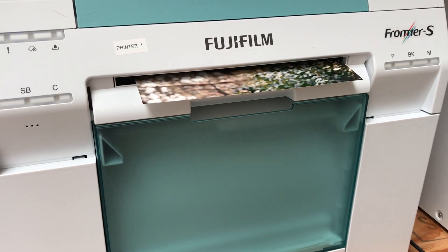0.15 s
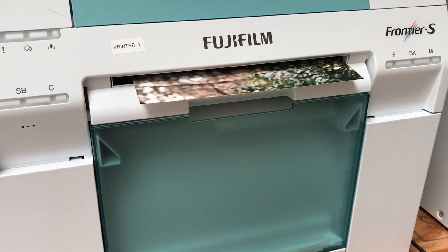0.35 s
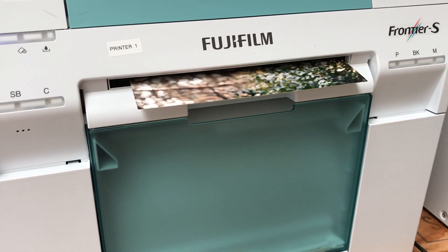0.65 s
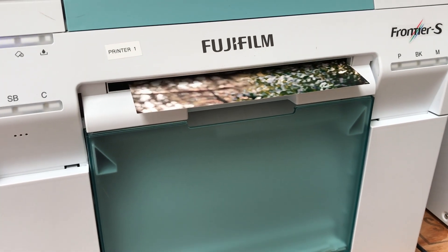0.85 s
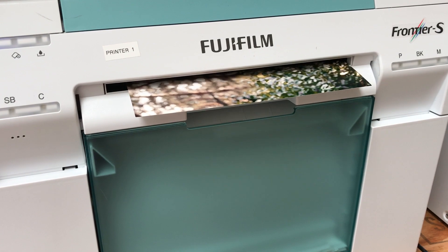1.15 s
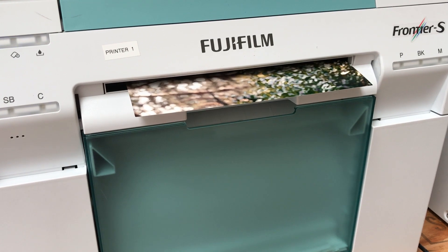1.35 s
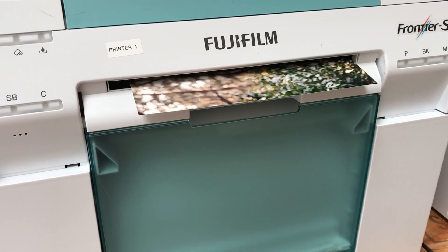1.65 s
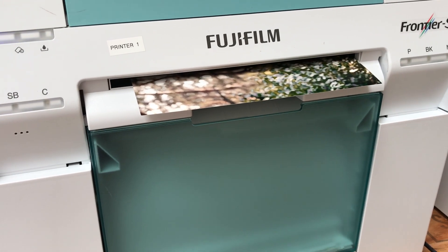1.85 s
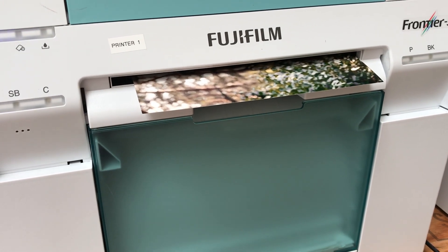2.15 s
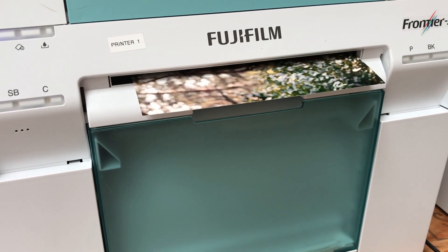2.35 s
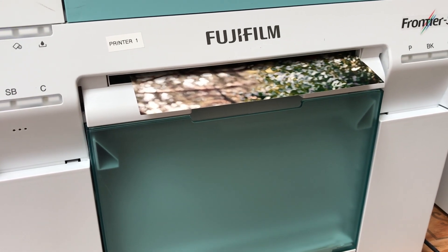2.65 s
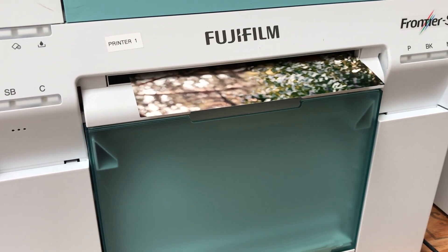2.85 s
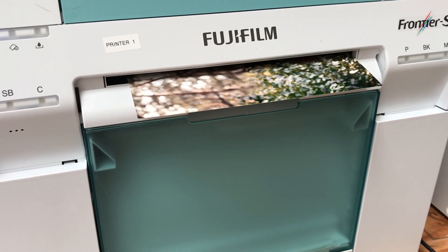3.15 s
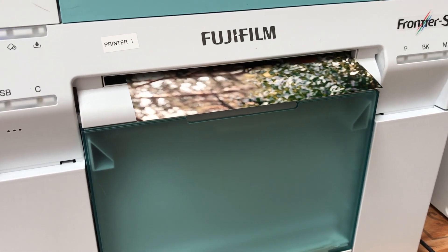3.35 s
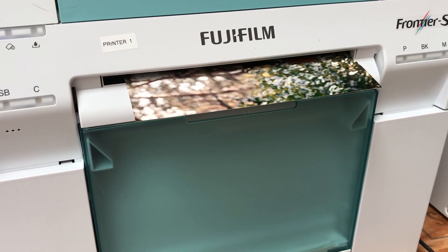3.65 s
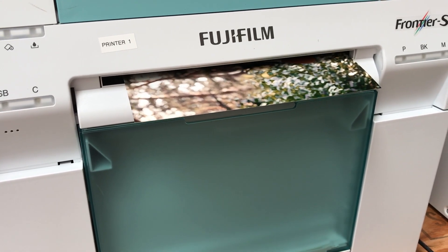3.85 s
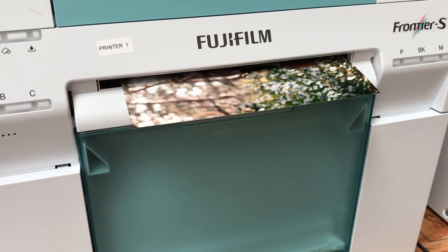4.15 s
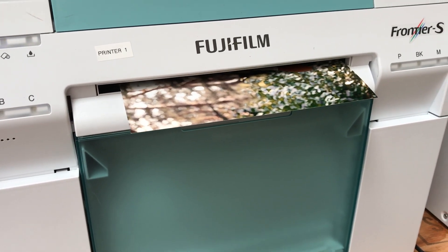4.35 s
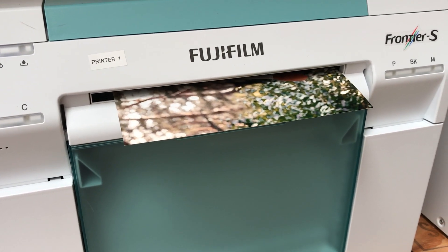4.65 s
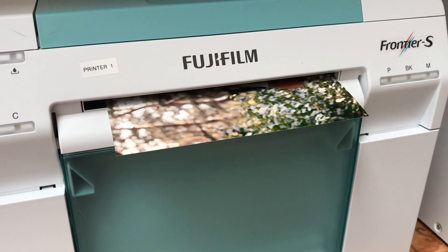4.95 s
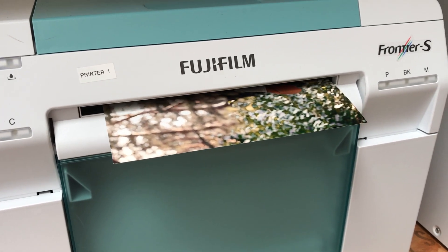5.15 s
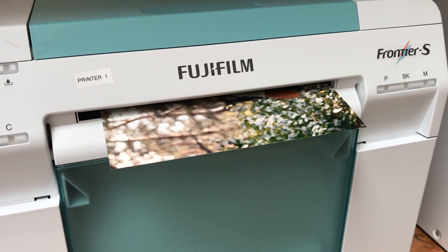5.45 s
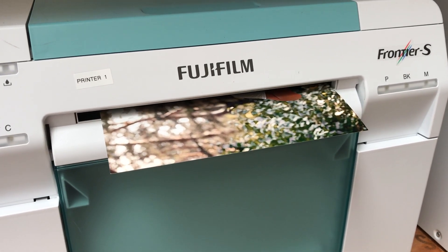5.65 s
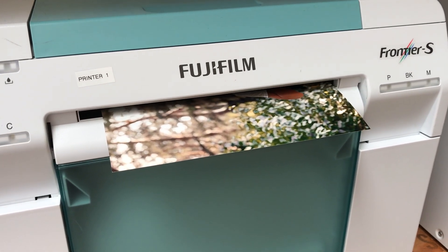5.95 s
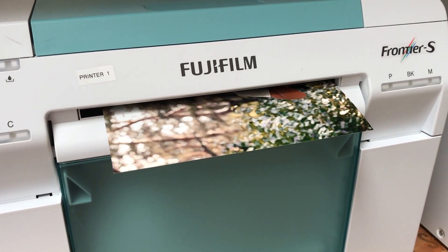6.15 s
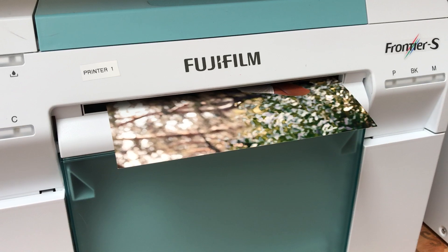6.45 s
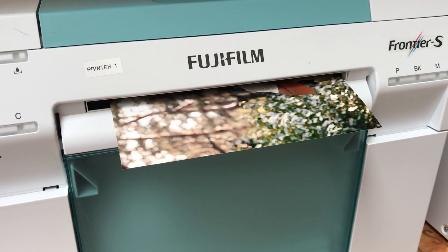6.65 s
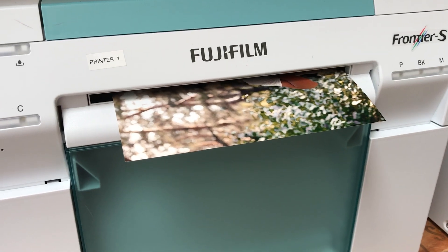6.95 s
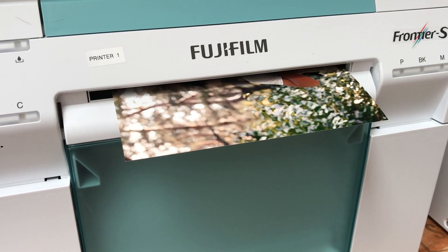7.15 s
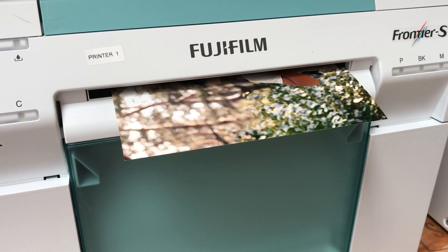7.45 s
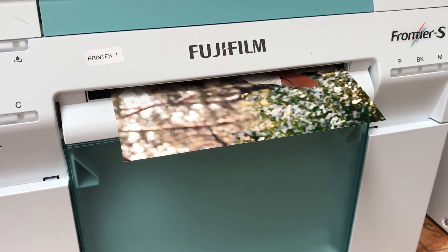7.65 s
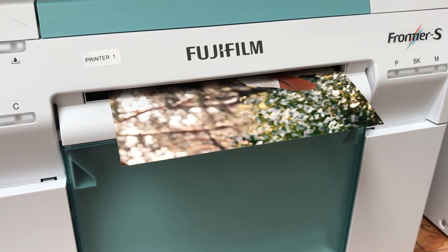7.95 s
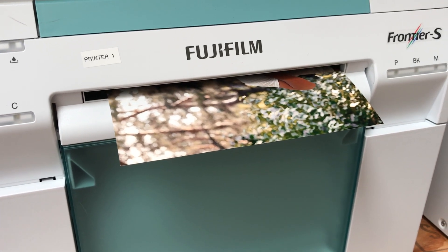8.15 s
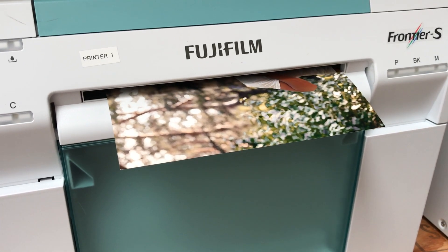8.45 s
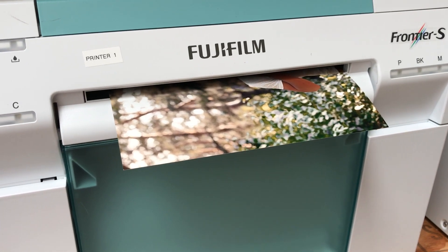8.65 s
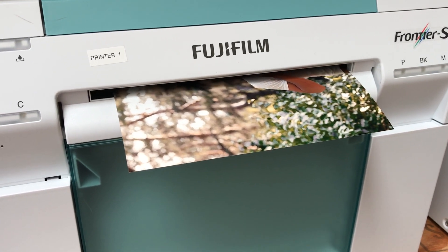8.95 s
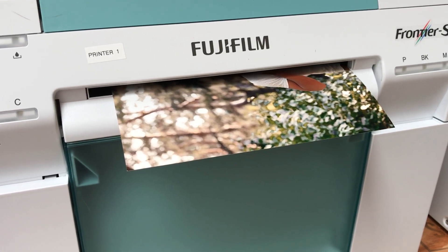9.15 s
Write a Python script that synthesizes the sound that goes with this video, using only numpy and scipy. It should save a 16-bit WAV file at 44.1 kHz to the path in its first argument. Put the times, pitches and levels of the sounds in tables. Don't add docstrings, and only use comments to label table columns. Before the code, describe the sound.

Close, constant fan hum, high whine and hiss from a printer, evenly spaced ticks and dull feed thumps, faint engine rumble outside midway through.

```python
import sys
import numpy as np
from scipy import signal
from scipy.fft import rfft, irfft
from scipy.io import wavfile

SR = 44100
rng = np.random.default_rng(int(sys.argv[2]) if len(sys.argv) > 2 else 0)


def store_wav(level_fs):
    pcm = np.round(np.clip(np.atleast_2d(level_fs), -1, 1) * 32767)
    wavfile.write(sys.argv[1], SR, pcm.T.astype(np.int16))


def natural_amplitude(level_db):
    exponent = np.asarray(level_db, float) / 20
    return 10 ** exponent


N = 410130
TIME = np.arange(N) / SR


def rms_one(x):
    return x / np.sqrt(np.mean(x ** 2) + 1e-20)


def in_time(rows):
    t, *columns = np.transpose(rows)
    return [np.interp(TIME, t, column) for column in columns]


def drift(rate_hz):
    r = np.exp(-80 * np.pi * rate_hz / SR)
    slow = signal.lfilter([1], [1, -2 * r, r * r], rng.standard_normal(N // 40 + 2002))
    slow = rms_one(slow[2000:])
    return np.interp(np.arange(N) / 40, np.arange(len(slow)), slow)


def coloured(points):
    hz, level_db = np.transpose(points)
    grid_hz = np.arange(1, N // 2 + 2) * SR / N
    shape = natural_amplitude(np.interp(np.log(grid_hz), np.log(hz), level_db, left=-90, right=-60))
    return rms_one(irfft(rfft(rng.standard_normal(N)) * shape, N))


def resonant(peaks, patchy_db):
    out = 0
    for hz, width_hz, level_db in peaks:
        r = np.exp(-np.pi * width_hz / SR)
        b = (1 - r * r) / 2 * np.array([1, 0, -1])
        a = [1, -2 * r * np.cos(2 * np.pi * hz / SR), r * r]
        once = signal.lfilter(b, a, rng.standard_normal(N))
        twice = signal.lfilter(b, a, once)
        out = out + natural_amplitude(level_db + patchy_db * drift(2.2)) * twice
    return rms_one(out)


def tone(turns, level_db):
    return np.sqrt(2) * natural_amplitude(level_db) * np.sin(2 * np.pi * (turns + rng.random()))


def struck(times, level_db, modes, envelope, density):
    spread_db = 1.5
    out = np.zeros(N)
    for t, peak in zip(times, natural_amplitude(level_db)):
        hits = rng.random(len(envelope)) < density / SR
        contacts = rng.standard_normal(len(envelope)) * hits
        contacts[0] = 1.5
        force = np.concatenate([contacts * envelope, np.zeros(len(envelope))])
        sound = 0
        for k, (hz, mode_db, t60) in enumerate(modes):
            r, w = natural_amplitude(-60 / (t60 * SR)), 2 * np.pi * hz / SR
            strength = (-1) ** k * natural_amplitude(mode_db + spread_db * rng.standard_normal())
            ring = signal.lfilter([0, np.sin(w)], [1, -2 * r * np.cos(w), r * r], force + 1e-18)
            sound = sound + strength * ring
        at = round(t * SR)
        out[at:at + len(sound)] += (peak * sound / np.abs(sound).max())[:N - at]
    return out


# t/s, level/dB
NEARNESS = [(0, -3), (.6, -5), (1.45, -4.5), (1.8, -0.5), (2.4, -0.5), (3.2, 0), (4.5, 0), (5.7, 1.5),
            (6.5, 0.5), (8, 0.5), (9.3, 0)]


def near(level_db, share):
    return level_db + share * in_time(NEARNESS)[0]


# multiple of fan speed, level/dB
SUCTION = [(2, -67), (8, -65), (12, -66), (15, -73), (16, -67.5)]
# multiple of fan speed, level/dB
DRYER = [(1, -60), (8, -69), (10, -75), (15, -75), (16, -73), (20, -70.5)]
# t/s, half length/s, level/dB
HUM_BEATS = [
    (5.953, 0.39, 2.5),
    (6.417, 0.16, -18),
    (7.0, 0.18, 1),
]


def fans():
    suction = np.cumsum(195.42 + 0.059 * drift(0.54)) / SR
    dryer = np.cumsum(202.04 + 0.042 * drift(0.66)) / SR
    beat_db = sum(db * np.exp(-((TIME - t) / half) ** 4) for t, half, db in HUM_BEATS)
    out = tone(suction, near(-47, .2) + beat_db)
    out += tone(5 * suction, near(-48.5, 2.6))
    out += tone(5 * dryer, near(-41, 0.87))
    out += tone(12 * dryer, near(-59.5, 2) + drift(3))
    for turns, tones in ((suction, SUCTION), (dryer, DRYER)):
        for multiple, level_db in tones:
            out += tone(multiple * turns, near(level_db, .6) + 0.7 * drift(3.9))
    return out


# f/Hz, width/Hz, level/dB
DUCT = [(198.8, 23.6, -6.5), (497.5, 11.3, -10), (476.6, 11, -15), (692.6, 114, -5), (804, 67, -4),
        (882, 120, -6.5), (984.7, 85, -2.5), (1042, 99, -1), (1199, 85, -9), (1466, 120, -15),
        (1590, 46, -16)]


def duct_roar():
    return natural_amplitude(near(-40, 0.47)) * resonant(DUCT, patchy_db=.6)


# f/Hz, level/dB per Hz
HISS = [(300, -35), (600, -5.5), (1300, 1), (2100, -4.5), (3300, -5.5), (4200, -5), (6000, -9.5),
        (7500, -10), (10300, -17.5), (13000, -17), (15700, -23)]
# f/Hz, width/Hz, level/dB
CASE = [(1861, 145, 2), (2485, 250, 0), (2822, 160, 1.5), (3646, 135, 1), (4356, 190, -4),
        (6500, 510, -17.5)]
# f/Hz, width/Hz, level/dB
SLOT = [(6510, 350, 3), (7240, 710, 1.5), (9600, 490, -0.5)]
# t/s, level/dB
TURNS_TO_SLOT = [
    (3.5, 0),
    (5.5, 0.5),
    (9.3, 3.5),
]


def case_hiss():
    slot_ring = natural_amplitude(near(-18, .3) + in_time(TURNS_TO_SLOT)[0]) * resonant(SLOT, patchy_db=1.0)
    hiss = coloured(HISS) + natural_amplitude(-7) * resonant(CASE, patchy_db=0.6) + slot_ring
    valley_hz, valley_width_hz, valley_depth = 3270, 130, 0.55
    b, a = signal.iirpeak(valley_hz, valley_hz / valley_width_hz, fs=SR)
    hiss = hiss - valley_depth * signal.lfilter(b, a, hiss)
    flutter_db = .35 * drift(11)
    return natural_amplitude(near(-47.5, 0.13) + flutter_db) * hiss


# f/Hz, level/dB per Hz
RUMBLE = [(20, -30), (35, -6.5), (55, -7.5), (110, -4.5), (170, -7.5), (260, -10.5), (360, -9),
          (450, -14.5), (700, -19.5)]


def street_rumble():
    return natural_amplitude(-50.5 + 1.2 * drift(1.3)) * coloured(RUMBLE)


# f/Hz, level/dB, t60/s
CLUTCH_MODES = [(3000, -9, .006), (4000, -4, .005), (4600, -3, .008), (5400, 0, .004), (6400, 0, .004),
                (7500, -1, .004), (8600, -3, .004), (9700, -5, .004), (11000, -8, .004), (12400, -17, .004)]


def clutch(times, level_db, density):
    t = TIME[:SR // 30]
    rattle = np.minimum(t / 0.0052 + 0.33, 1) * np.exp(-t / 0.011)
    return struck(times, level_db, CLUTCH_MODES, rattle, density)


# f/Hz, level/dB, t60/s
CHASSIS_MODES = [(113, -11.5, 0.085), (159, -3.5, 0.19), (222, 0.5, 0.14), (256, 6, 0.018),
                 (317, -1.5, 0.083), (379, -1, 0.078), (460, -3, 0.012), (617, 1.5, 0.02),
                 (684, -5.5, 0.086), (850, -5, 0.024)]


def chassis_rumble(times, level_db, density):
    t = TIME[:SR // 8]
    swell = t / .014 * np.exp(1 - t / 0.017)
    return struck(times, np.full(len(times), level_db), CHASSIS_MODES, swell, density)


# f/Hz, level/dB, t60/s
SNAP_MODES = [(3000, -14, .005), (3900, -10, .005), (5200, -11, .004), (6500, -5, .007), (7700, -11, .003),
              (8900, -2, .003), (9800, -2, .005), (10750, -3, .005), (11800, -6, .003), (13000, -13, .004),
              (14300, -16, .004), (15500, -15, .003)]


def backlash_snap(times, level_db):
    t = TIME[:SR // 30]
    crack = np.exp(-t / 0.0011) + 0.59 * np.exp(-t / 0.0061)
    return struck(times + 0.00067, level_db + 0.24, SNAP_MODES, crack, density=17000)


# f/Hz, level/dB, t60/s
KNOCK_MODES = [(617, -6, 0.042), (890, -2, 0.021), (1410, -0.5, 0.02), (1760, 0, 0.024), (2280, -9, 0.018)]


def case_knock(times, level_db):
    t = TIME[:SR // 30]
    return struck(times + 0.00183, level_db + .4, KNOCK_MODES, np.exp(-t / 0.0021), density=3100)


def paper_scrape(times):
    scrape = coloured([(400, 0), (900, 9.5), (1500, -0.5), (2200, -2.0), (3300, -6.0), (5000, -14.0), (9000, -21)])
    t = TIME[:SR // 8]
    starts = np.zeros(N)
    starts[np.round(times * SR).astype(int)] = 1
    stroke = signal.fftconvolve(starts, np.minimum(t / 0.0005, 1) * np.exp(-t / 0.037))[:N]
    return natural_amplitude(near(-37.5, 0.45)) * scrape * stroke


# clutch t/s, clutch peak level/dB, backlash travel t/ms, snap peak level/dB, case knock level/dB
PASSES = [(0.132, -37, 40.5, -23.5, -29), (0.6767, -32, 43.8, -26.5, -39), (1.2216, -33.5, 29.5, -34, -42),
          (1.7656, -38, 35.7, -35, -34), (2.3131, -35, 35.3, -28, -37), (2.8584, -31, 38.9, -28.5, -38),
          (3.4037, -32, 39.4, -24.5, -36), (3.9474, -32, 24.5, -36, -39), (4.4927, -29, 39.5, -26.5, -35),
          (5.0394, -32, 36.8, -29.5, -36), (5.5877, -37, 36.7, -25.5, -31), (6.131, -33, 42.9, -24, -34),
          (6.6752, -35, 34.2, -46, -39), (7.223, -35.5, 27.9, -35, -37), (7.769, -32.5, 28, -29.5, -39),
          (8.3125, -37.5, 41.9, -26, -38), (8.856, -33, 30.7, -32, -37)]


def feed():
    start_s, clutch_db, travel_ms, snap_db, knock_db = np.transpose(PASSES)
    snap_s, step_s, stop_s = start_s + travel_ms / 1000, start_s + .044, start_s + .115
    out = clutch(start_s, clutch_db - .6, density=9700)
    out += chassis_rumble(start_s, -39.5, density=1100)
    out += backlash_snap(snap_s, snap_db)
    out += case_knock(snap_s, knock_db)
    out += chassis_rumble(step_s - .008, -33.5, density=4800)
    out += paper_scrape(step_s)
    out += clutch(stop_s, np.full(len(stop_s), -48.5), density=12000)
    return out


def engine(rows, orders=(), eases_off_s=99, flutter_db=0.):
    hz, firing_db = in_time(rows)
    fade = np.clip(np.minimum(TIME - rows[0][0], rows[-1][0] - TIME) / .08, 0, 1)
    turns = np.cumsum(hz) / SR
    ease_db = -14 * np.maximum(TIME - eases_off_s, 0)
    out = tone(turns, firing_db + flutter_db * drift(2.2))
    for multiple, level_db in orders:
        out += tone(multiple * turns, ease_db + level_db + 4.8 * drift(6.8))
    return fade * out


# t/s, f/Hz, level/dB
DRONE = [
    (1.15, 112.6, -63),
    (2.8, 114.7, -58),
    (2.97, 117.4, -52),
    (3.25, 116.4, -70),
    (3.46, 116.5, -60),
    (3.6, 114, -66),
]


def drone_next_door():
    return engine(DRONE, flutter_db=2.5)


# t/s, firing f/Hz, level/dB
NEAR_ENGINE = [
    (5.25, 48.3, -64),
    (5.44, 53.6, -49),
    (5.55, 62.1, -54),
    (5.86, 72.6, -55),
    (6.2, 76.6, -56.5),
    (6.82, 86.3, -38),
    (7.06, 89, -55),
    (7.18, 77, -44),
    (7.35, 61.4, -61),
]
# multiple of firing, level/dB
NEAR_ORDERS = [(2, -62), (2.5, -66)]


def near_engine():
    return engine(NEAR_ENGINE, NEAR_ORDERS)


# t/s, firing f/Hz, level/dB
FAR_ENGINE = [
    (5.6, 47, -64),
    (6.4, 51.4, -53),
    (6.95, 55.6, -43),
    (7.25, 55.6, -53),
    (7.55, 55.7, -49),
    (7.75, 57.2, -53),
    (8.05, 48.4, -54),
    (8.2, 40.7, -59),
    (8.45, 40, -62),
]
# multiple of firing, level/dB
FAR_ORDERS = [(2.5, -55.5), (3, -66), (4, -60)]


def far_engine():
    return engine(FAR_ENGINE, FAR_ORDERS, eases_off_s=6.8)


# t/s, firing f/Hz, level/dB
LAST_ENGINE = [
    (7.95, 90.5, -62),
    (8.15, 88, -56),
    (8.35, 81.5, -58),
    (8.45, 72, -60),
    (8.9, 65.9, -63),
]


def last_engine():
    return engine(LAST_ENGINE)


def scene():
    printer = fans() + duct_roar() + case_hiss() + feed()
    street = street_rumble() + drone_next_door() + near_engine() + far_engine() + last_engine()
    return (printer + street)[None]


def band_limit(x):
    return signal.sosfilt(signal.butter(12, 16500, fs=SR, output="sos"), x)


# low f/Hz, high f/Hz
BAND_HZ = [38, 15850]


def record(dry):
    dry = signal.sosfilt(signal.butter(4, BAND_HZ[0], "high", fs=SR, output="sos"), dry)
    dry = signal.sosfilt(signal.ellip(12, .3, 70, BAND_HZ[1], fs=SR, output="sos"), dry)
    return band_limit(dry)


dry = scene()
out = record(dry)
store_wav(out)
```